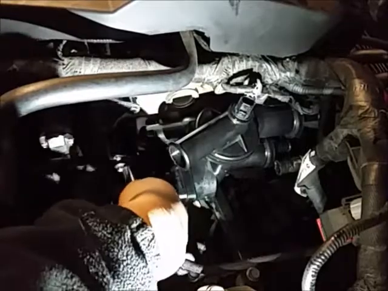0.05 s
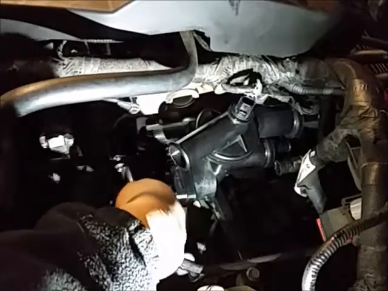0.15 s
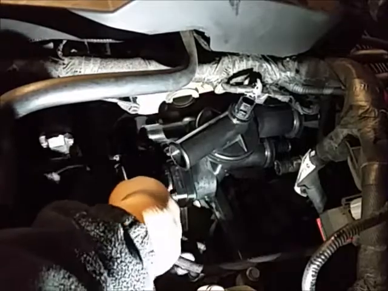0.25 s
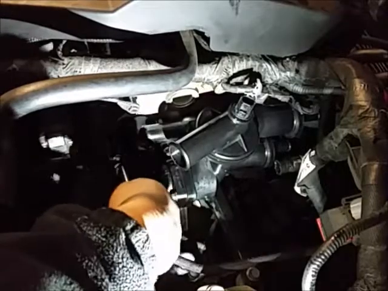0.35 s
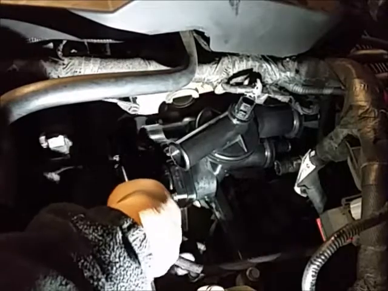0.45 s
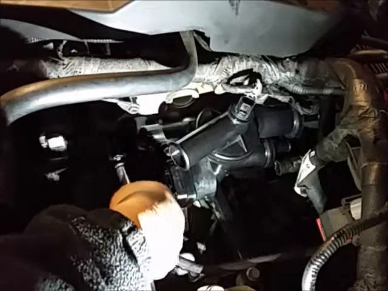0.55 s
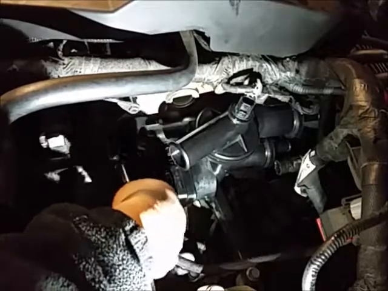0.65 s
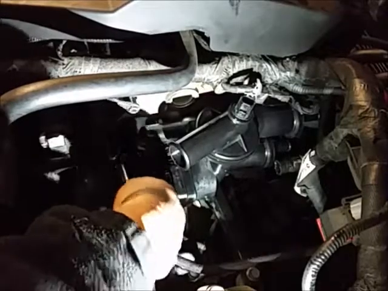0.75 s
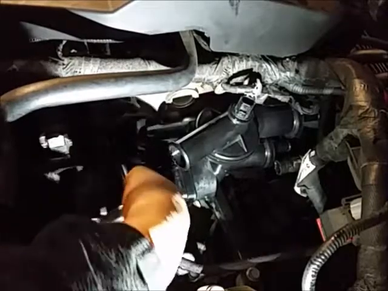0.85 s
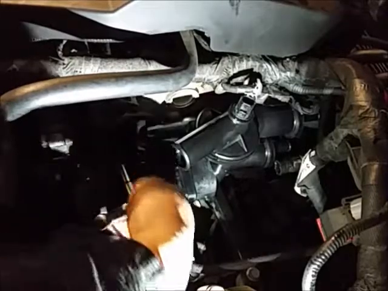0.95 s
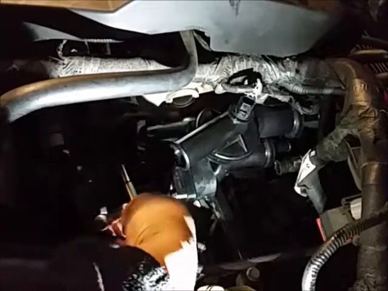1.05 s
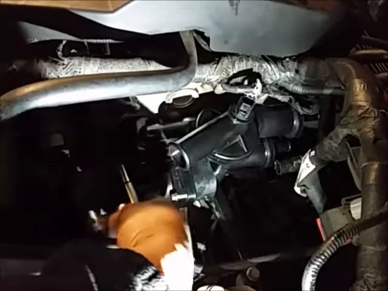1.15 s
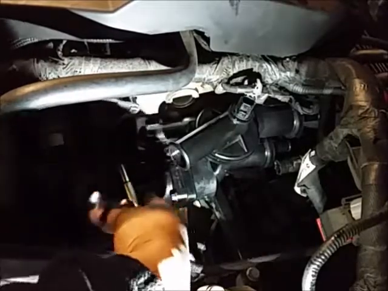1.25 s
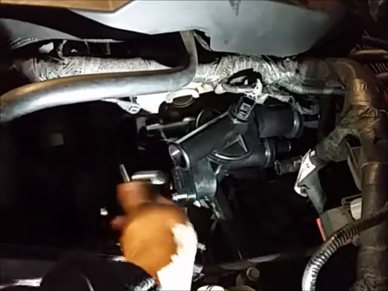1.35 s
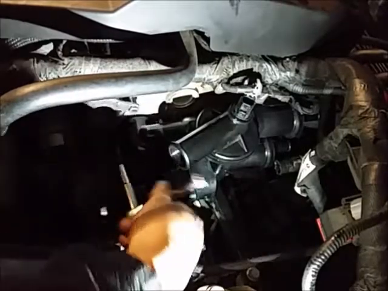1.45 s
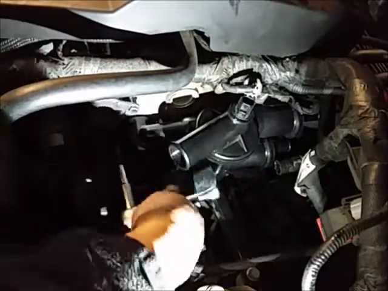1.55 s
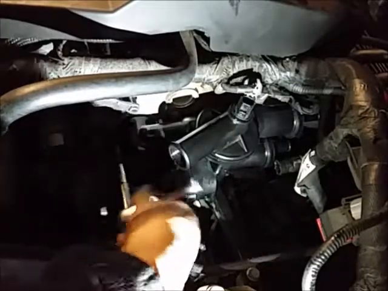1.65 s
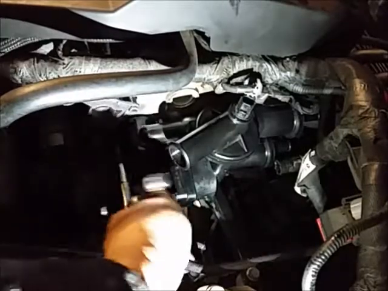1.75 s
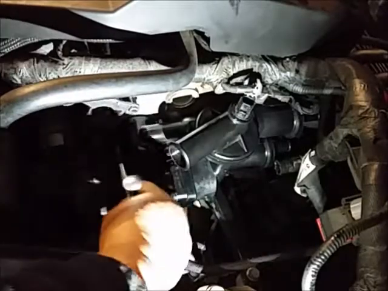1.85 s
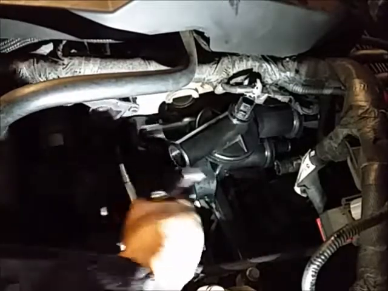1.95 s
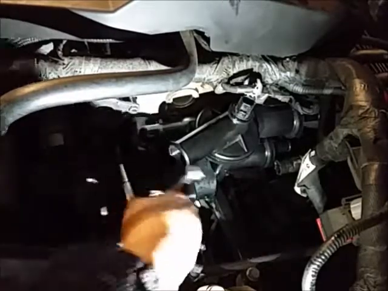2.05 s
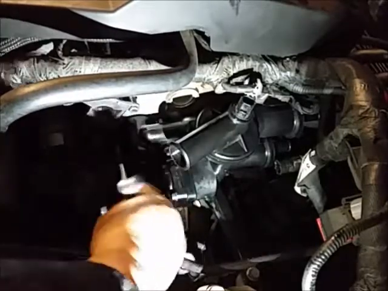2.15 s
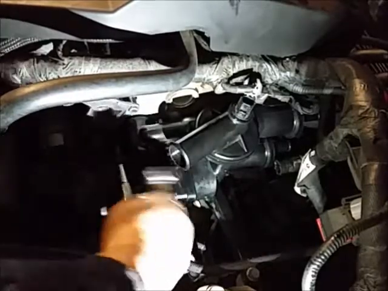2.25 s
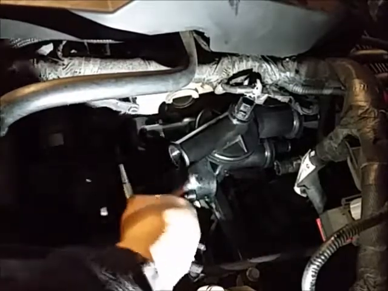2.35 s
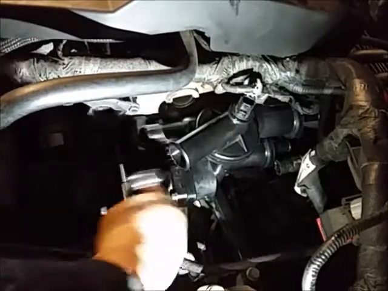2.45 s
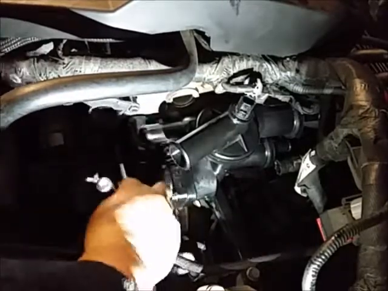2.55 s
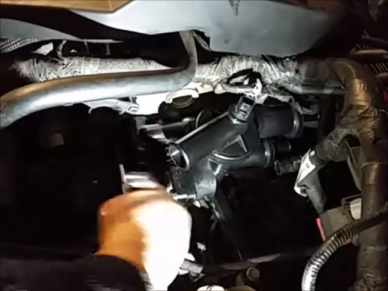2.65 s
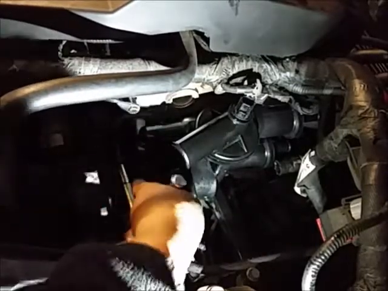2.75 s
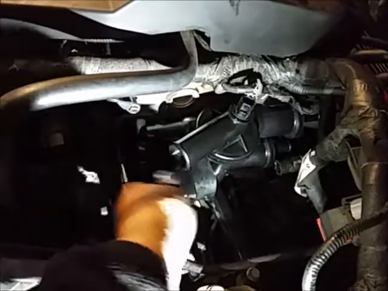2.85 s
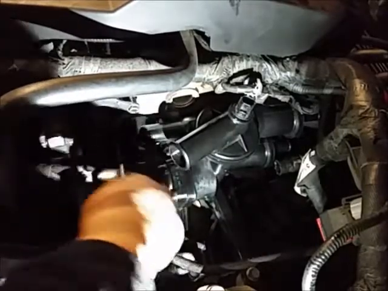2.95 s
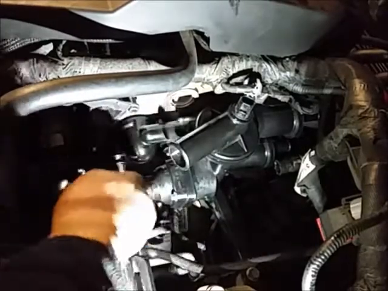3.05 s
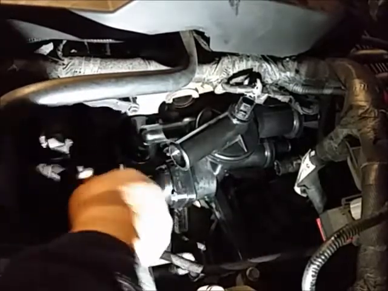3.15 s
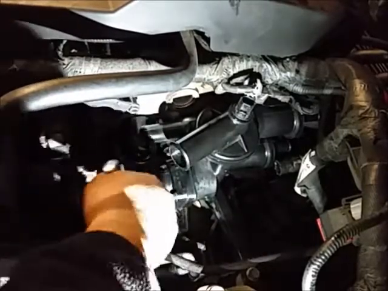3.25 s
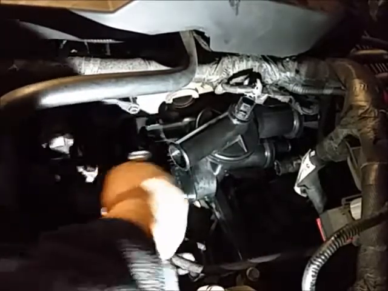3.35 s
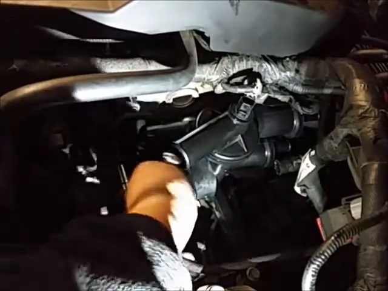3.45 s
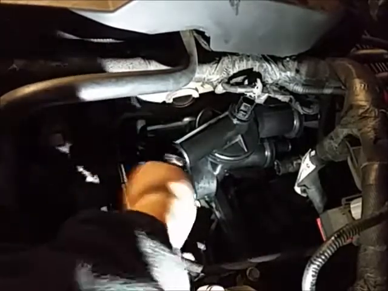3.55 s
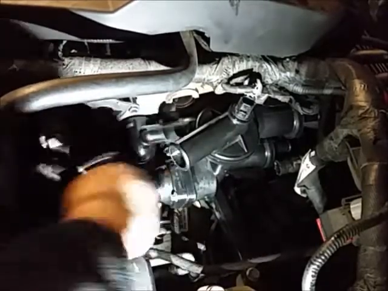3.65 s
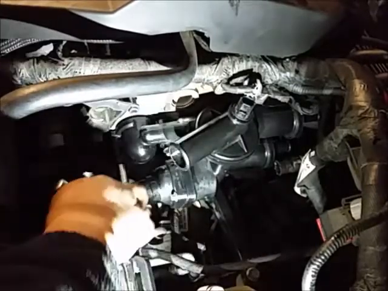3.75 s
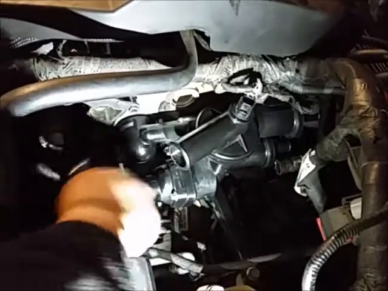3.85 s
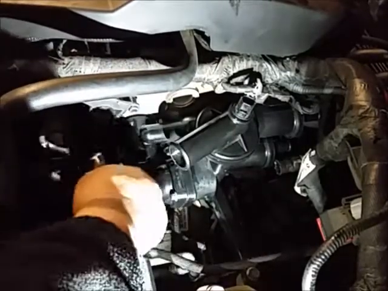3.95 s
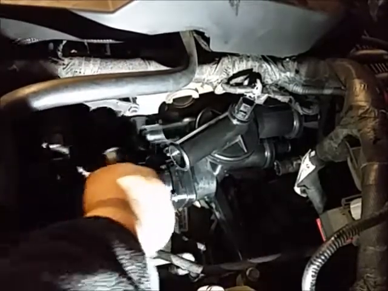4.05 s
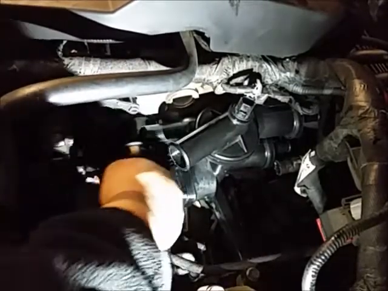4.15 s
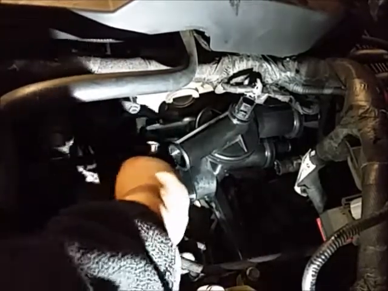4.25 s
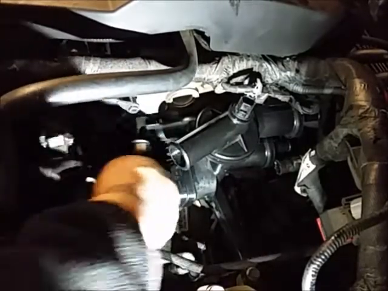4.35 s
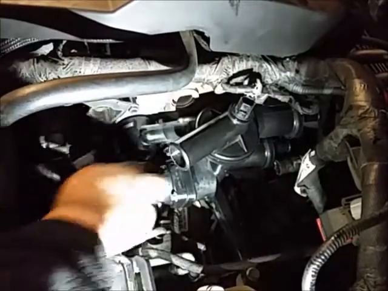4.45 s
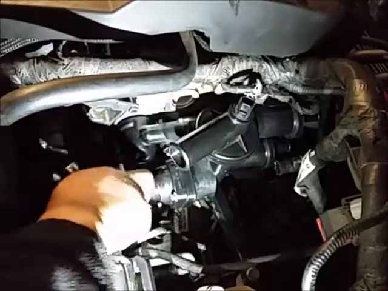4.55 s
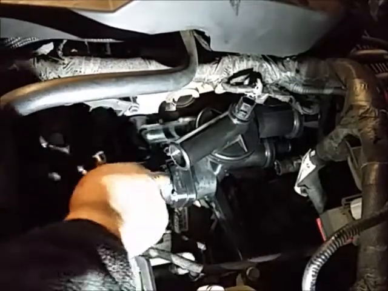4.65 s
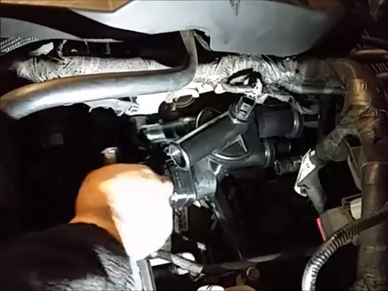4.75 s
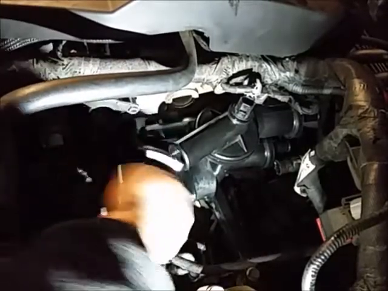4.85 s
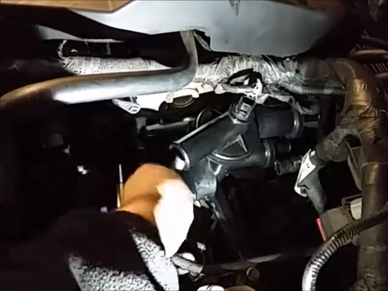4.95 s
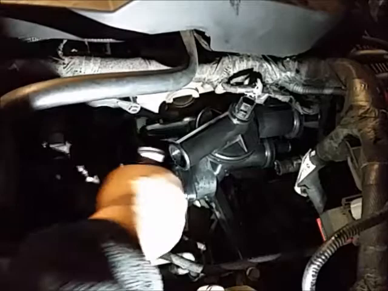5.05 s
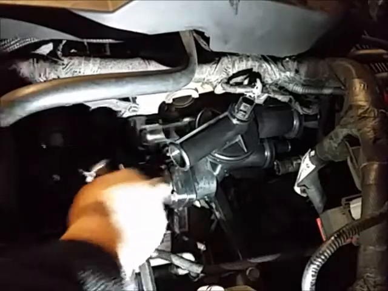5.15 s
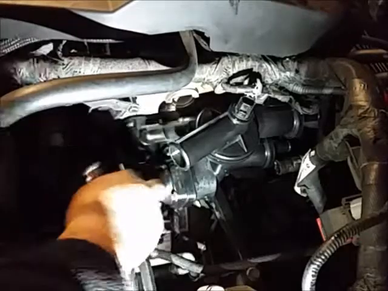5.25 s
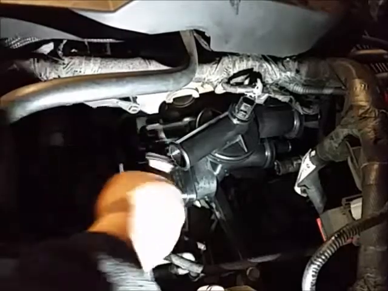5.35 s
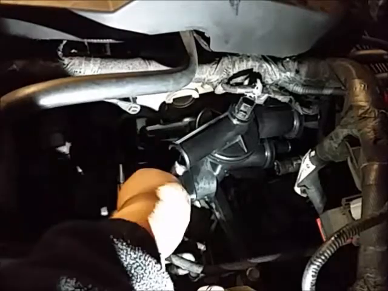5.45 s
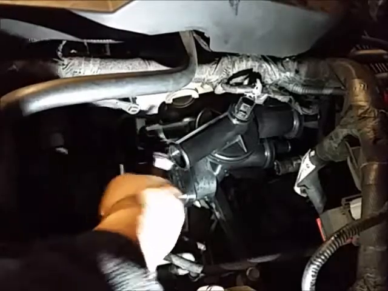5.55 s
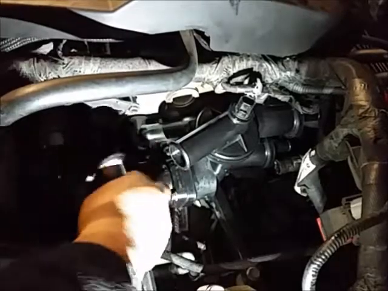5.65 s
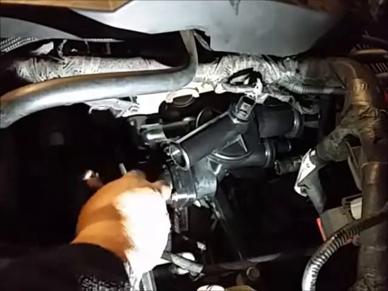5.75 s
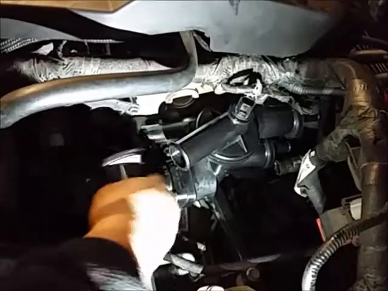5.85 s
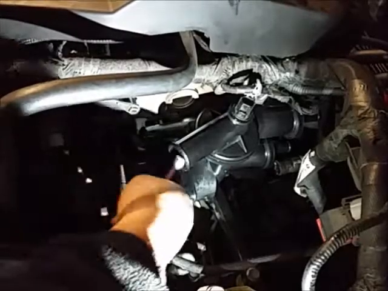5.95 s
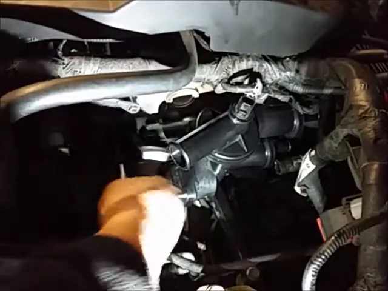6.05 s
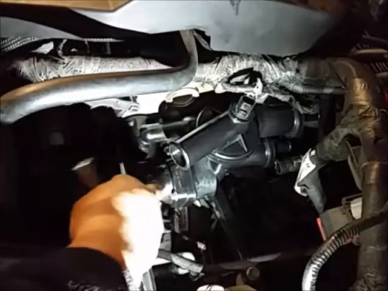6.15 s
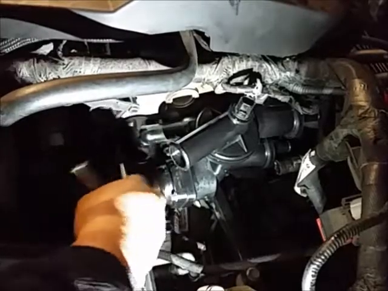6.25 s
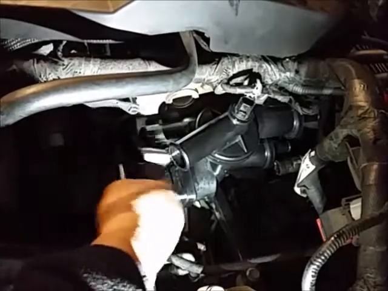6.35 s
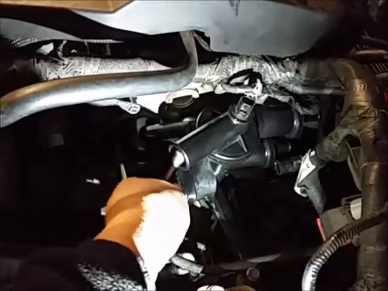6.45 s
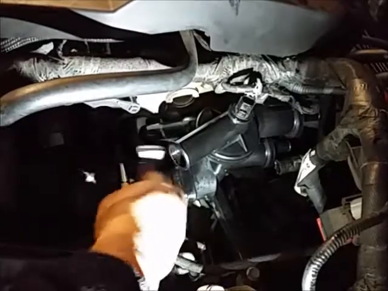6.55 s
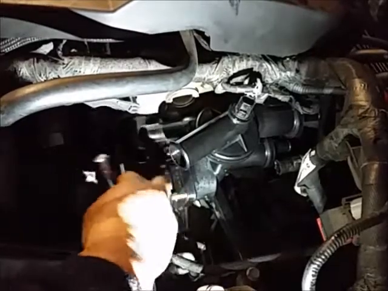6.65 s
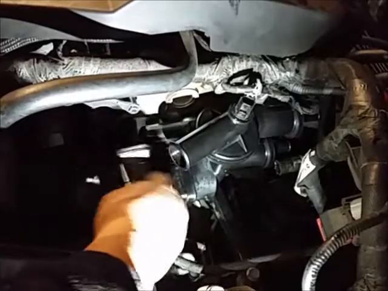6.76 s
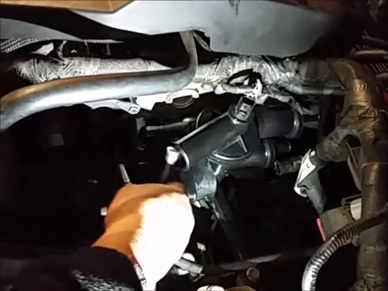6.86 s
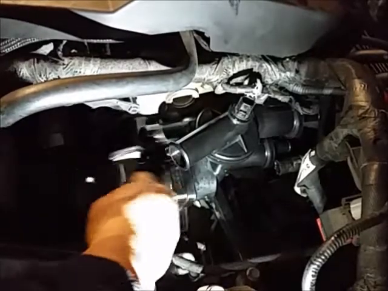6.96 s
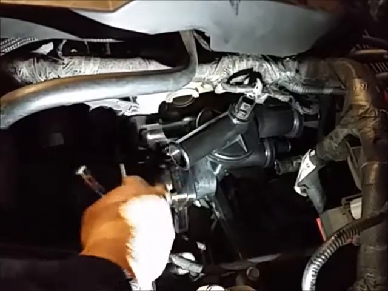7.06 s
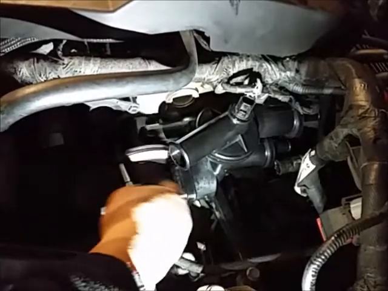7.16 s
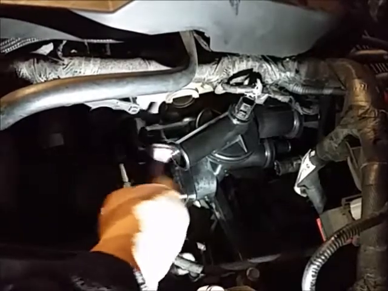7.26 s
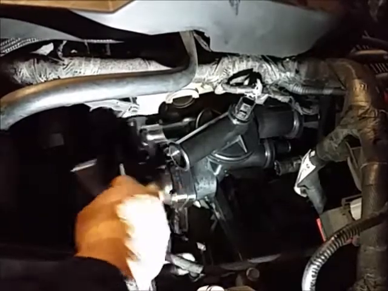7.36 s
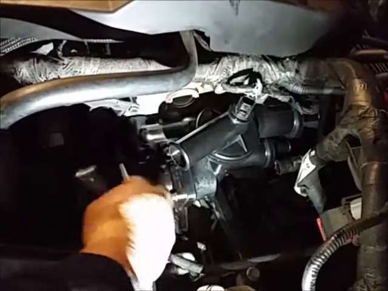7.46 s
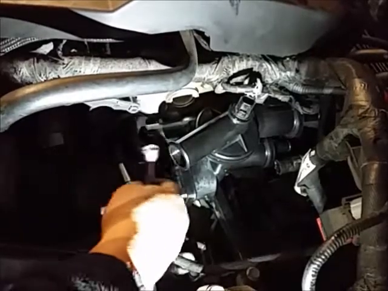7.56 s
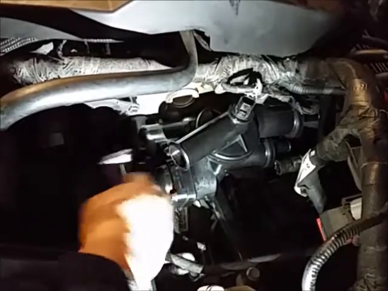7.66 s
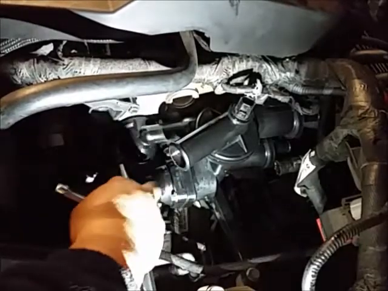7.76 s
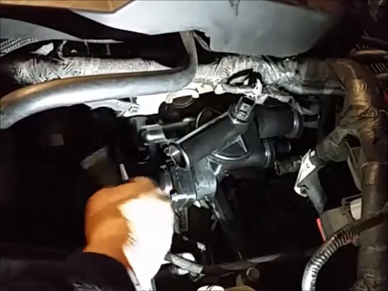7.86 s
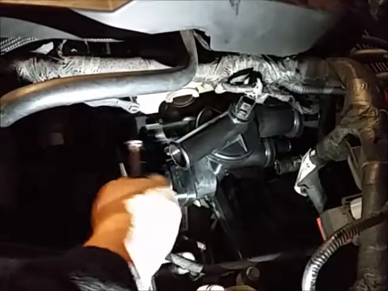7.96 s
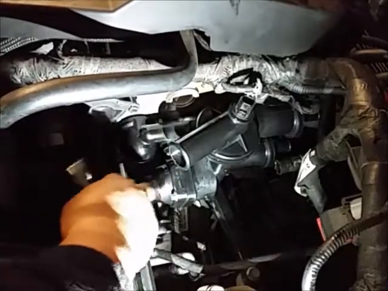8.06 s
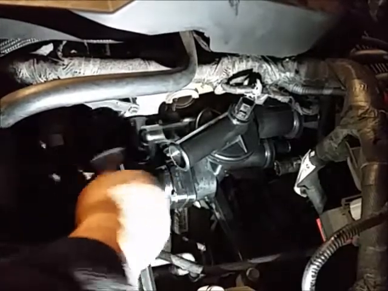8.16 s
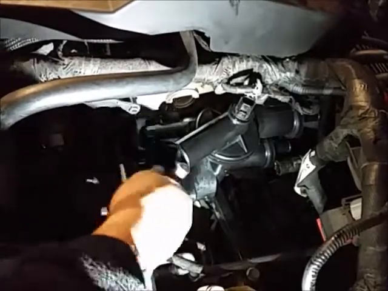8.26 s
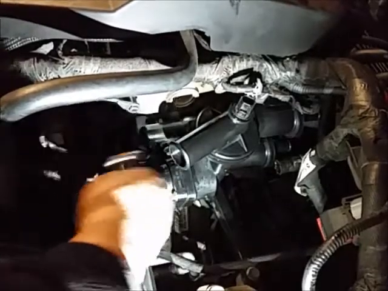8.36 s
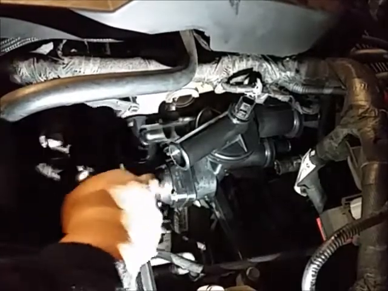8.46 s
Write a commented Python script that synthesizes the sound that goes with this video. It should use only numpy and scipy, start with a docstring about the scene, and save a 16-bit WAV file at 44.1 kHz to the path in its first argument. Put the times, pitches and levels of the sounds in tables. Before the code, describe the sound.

Metal knocks and quick bursts of ratchet clicking on an engine, with constant high-pitched hiss and faint distant traffic rumble.

```python
"""A knock of steel on an engine comes first, then a ratchet wrench clicks in runs in a garage.
Each knock excites the damped modes of the engine's covers; each click is the pawl snapping over a tooth
and ringing the ratchet head. Between them, friction of hand and wrench gives a rub and a fine scrape.
Far traffic drones through the walls over steady air and mains hum; the left microphone hisses near 5 kHz."""
import sys
import numpy as np
from scipy.fft import rfft, irfft, next_fast_len
from scipy.io import wavfile
from scipy.ndimage import map_coordinates

SR = 44100
rng = np.random.default_rng(int(sys.argv[2]) if len(sys.argv) > 2 else 0)


def dump(signal):
    """Clip the signal to [-1, 1] and save it as 16-bit WAV at the path in sys.argv[1]."""
    limited = np.clip(np.atleast_2d(signal).T, -1, 1)
    pcm = np.round(limited * 32767).astype(np.int16)
    wavfile.write(sys.argv[1], SR, pcm)


N = 375732


def amp(db):
    """Amplitude ratio of a level in decibels."""
    return np.exp(np.asarray(db) * (np.log(10) / 20))

def unit(x):
    """Normalisation to rms 1."""
    return x / np.sqrt(np.mean(x ** 2) + 1e-20)

def along(points, hz):
    """Interpolation of (f/Hz, value) points on a logarithmic frequency axis."""
    f, values = np.transpose(points)
    return np.interp(np.log(hz + 1), np.log(f + 1), values)

def curves(rows):
    """Linear interpolation in time: one value per sample for each column after t/s."""
    times, *columns = np.transpose(rows)
    return [np.interp(np.arange(N) / SR, times, column) for column in columns]

def wobble(rate):
    """Smooth random modulation: a spline through `rate` Gaussian values a second."""
    return map_coordinates(rng.standard_normal(int(N * rate / SR) + 4), [np.arange(N) * rate / SR])

def filtered(x, response):
    """Linear filtering: the spectrum is multiplied by a complex frequency response."""
    size = next_fast_len(N + 8192)
    return irfft(rfft(x, size) * response(np.fft.rfftfreq(size, 1 / SR)), size)[..., :N]

# Likeness of the sound field at the two microphones: f/Hz, coherence
COHERENCE = [(40, 1), (150, 0.89), (400, 0.77), (1500, 0.2), (4000, 0.1), (10000, 0.012)]
def diffuse_noise(gain):
    """A diffuse field is coherent at long wavelengths: stereo noise of rms 1, shaped by gain(f)."""
    size = next_fast_len(N)
    hz = np.fft.rfftfreq(size, 1 / SR)
    angle = np.arccos(np.clip(along(COHERENCE, hz), -1, 1)) / 2
    real, imag = rng.standard_normal((2, 2, len(hz)))
    mid, side = irfft((real + 1j * imag) * gain(hz) * [np.cos(angle), np.sin(angle)], size)[:, :N]
    return unit(np.array([mid + side, mid - side]))

# Garage air, low and treble spectra: f/Hz, relative density/dB
AIR_LOW = [(180, -31.5), (300, 2), (420, -4), (478, 1.5), (754, -14.5), (946, -14), (1510, -16),
           (4000, -24), (5200, -58.5), (8800, -120)]
AIR_TREBLE = [(3000, -40.5), (3800, -3.5), (5000, 3.5), (6000, -1), (6400, -26), (7000, -70)]
def garage_air():
    """Stationary noise in two broad bands forms the ambient floor."""
    low = amp(-66.5) * diffuse_noise(lambda f: amp(along(AIR_LOW, f)))
    treble = amp(-76.5) * diffuse_noise(lambda f: amp(along(AIR_TREBLE, f)))
    return low + treble

def drone(hz, db):
    """Slow phase and amplitude modulation make a sinusoid waver."""
    phase = 2 * np.pi * np.cumsum(hz) / SR + 0.31 * wobble(5.1)
    return np.sqrt(2) * amp(db + 2.3 * wobble(3.4)) * np.sin(phase)

def mains_hum():
    """A wavering tone at twice the supply frequency."""
    return drone(hz=np.full(N, 120), db=-56)

# Envelope of the traffic rumble: t/s, level/dB
RUMBLE_LEVEL = [(0, -46.5), (.35, -50), (.95, -49.5), (1.9, -45.5), (3.1, -43.5), (3.84, -45), (4.08, -41),
                (4.6, -45.5), (5.4, -44), (6.19, -42.5), (6.45, -45), (7.2, -43), (7.6, -45), (8.52, -45.5)]
# Its spectrum: f/Hz, relative density/dB
RUMBLE_SPECTRUM = [(12, -46), (20, -8.5), (54, -5.5), (85, -3.5), (134, -11), (166, -10), (189, -16),
                   (226, -14), (265, -40), (300, -24.5), (390, -53), (660, -120)]
# Truck engine: t/s, firing f/Hz, level at f/dB, level at 1.5 f/dB
TRUCK = [(1.8, 42.5, -56, -55), (2.53, 53, -47, -48), (3.32, 65, -52, -52), (3.5, 76, -48, -56),
         (3.75, 81.5, -49, -57), (4.44, 80, -42, -63), (4.8, 84.5, -45, -68), (4.96, 79, -45, -58),
         (6.42, 85.5, -54, -55), (7.3, 76, -54, -49), (7.79, 79.2, -44.5, -68), (8.52, 82, -48, -62)]
# Car engine: t/s, firing f/Hz, level/dB
CAR = [(4.9, 95.1, -44), (5.3, 95.2, -43), (5.8, 96.5, -47), (6.5, 96.6, -52)]
def traffic():
    """Walls transmit mainly bass: broadband rumble and the periodic firing of two far engines."""
    def fade(rows):
        t = np.arange(N) / SR
        return np.clip((t - rows[0][0]) / 0.25, 0, 1) * np.clip((rows[-1][0] + .3 - t) / 0.23, 0, 1)

    rumble_db = curves(RUMBLE_LEVEL)[0] + 0.43 * wobble(3.123)
    rumble = amp(rumble_db) * diffuse_noise(lambda f: amp(along(RUMBLE_SPECTRUM, f)))
    hz, firing_db, upper_db = curves(TRUCK)
    truck = drone(hz, firing_db) + drone(hz * 1.5, upper_db)
    truck += sum(drone(hz * order, firing_db - 12) for order in (.5, 2))  # further shaft orders
    return rumble + fade(TRUCK) * truck + fade(CAR) * drone(*curves(CAR))

def pawl_drag(width_s=.08, lag_s=.05, clicks_to_saturate=4):
    """Drag follows click density: 0 at rest, towards 1 while the pawl rides over a run of teeth."""
    t = np.arange(0, N / SR, .005)
    delay = t[:, None] - lag_s - np.array(CLICKS)[:, 0]
    density = np.exp(-.5 * (delay / width_s) ** 2).sum(axis=1)
    return np.interp(np.arange(N) / SR, t, np.tanh(density / clicks_to_saturate))

# Envelope of the rubbing: t/s, level/dB
RUB_LEVEL = [(0.0, -56), (0.14, -61), (0.95, -63), (1.54, -62), (1.73, -58), (2.16, -59), (2.54, -56),
             (3.68, -59), (3.89, -57), (4.27, -61), (4.48, -61), (4.62, -57), (5.03, -59), (5.15, -53),
             (5.86, -58), (6.26, -55), (6.36, -57), (7.26, -52), (7.45, -53), (7.62, -58), (8.19, -57),
             (8.52, -55)]
# Spectra of the dull rub and the metallic scrape: f/Hz, relative density/dB
RUB_SPECTRUM = [(140, -30.5), (240, -5), (450, -9), (700, -13), (1100, -17), (1500, -22.5), (2800, -30),
                (5000, -29.5), (6100, -32.5), (6500, -61), (8000, -120)]
SCRAPE_SPECTRUM = [(5290, -45), (9000, -28.5), (9480, -20), (10100, -9.5), (11400, -4), (12700, -2.5),
                   (13500, 3), (15900, 4.5)]
def friction():
    """Sliding friction of hand and wrench: uneven noise through the engine's modes, and a fine scrape."""
    def resonance(f):
        return 3 + 0.28 * sum(1 / (1 + ((f - hz) * t60 / 3) ** 2) for hz, _, t60 in ENGINE_MODES)

    rub_db, = curves(RUB_LEVEL)
    drag = pawl_drag()
    rub = amp(1.2 * wobble(8) + 3.3 * wobble(30) + 0.536 * wobble(90))
    rub = rub * diffuse_noise(lambda f: resonance(f) * amp(along(RUB_SPECTRUM, f)))
    flicker = amp(1.2 * wobble(55))
    scrape = flicker * diffuse_noise(lambda f: amp(along(SCRAPE_SPECTRUM, f)) * (f < 15850))
    # Full drag adds 7 dB to the scrape and 1 dB to the rub.
    scrape_db = -74.5 + 7 * drag + .4 * (rub_db - rub_db.mean())
    return amp(rub_db + drag) * unit(rub) + amp(scrape_db) * unit(scrape)

def impacts(times, mode_db, noise_db, decay_scale, pan_gains, modes, bands, scatter_db, detune, rise_s):
    """Modal superposition: each blow excites damped sinusoids and noise that decays band by band."""
    lead = SR // 10  # room for a blow before t = 0
    sound = np.zeros((2, N + lead + SR))
    band_power = np.zeros((len(bands), *sound.shape))
    hz, level, t60 = np.transpose(modes)[:, :, None]
    low_hz, high_hz, band_db, band_t60 = np.transpose(bands)[:, :, None]
    t = np.arange(int(SR * t60.max())) / SR
    t_noise = np.arange(int(SR * band_t60.max())) / SR
    rise = (1 - np.exp(-t_noise / rise_s)) ** 2  # the contact force builds smoothly
    spread = np.arccos(np.clip(along(COHERENCE, hz), -1, 1))[:, 0]
    chance = rng.standard_normal((len(times), len(modes), 3))
    for k, start in enumerate(np.round(times * SR).astype(int) + lead):
        stretch = np.clip(decay_scale[k], .4, 1.6)
        gain = amp(mode_db[k] + scatter_db * chance[k, :, 0])
        pitch = hz * (1 + detune * chance[k, :, 1:2])
        damping = np.log(1000) / (t60 * stretch)
        ring = amp(level) * np.exp((2j * np.pi * pitch - damping) * t) * rise[:len(t)]
        angle = spread * chance[k, :, 2] / 2  # each microphone meets a mode at its own phase
        mid = (gain * np.cos(angle)) @ ring.imag
        side = (gain * np.sin(angle)) @ ring.real
        pan = pan_gains[k][:, None]
        sound[:, start:start + len(t)] += pan * [mid + side, mid - side]
        burst = rise * amp(band_db + noise_db[k][:, None] - 60 * t_noise / (band_t60 * stretch))
        band_power[:, :, start:start + len(t_noise)] += (burst[:, None] * pan) ** 2
    sound = sound[:, lead:lead + N]
    for low, high, power in zip(low_hz, high_hz, band_power):
        order = 12 + high / 300
        noise = diffuse_noise(lambda f: 1 / (1 + (low / (f + 1)) ** 12) / (1 + (f / high) ** order))
        sound += np.sqrt(power[:, lead:lead + N]) * noise
    return sound

# Blows on the engine: t/s, level/dB, then relative level/dB of the thud (below 300 Hz),
# body (near 400 Hz), bite (near 1.5 kHz) and snap (near 3 kHz)
KNOCKS = [(0.296, -44, -14, -12, -12, -25), (0.327, -40, -12, -13, -9, -17), (0.649, -40, -3, -9, -18, -35),
          (0.698, -45, -8, -7, -16, -28), (0.723, -41, -7, -12, -10, -26), (0.863, -40, -7, -7, -28, -34),
          (0.932, -45, -5, -8, -14, -30), (0.964, -50, -2, -12, -10, -25), (1.433, -41, -10, -10, -19, -35),
          (1.512, -47, -4, -12, -8, -26), (1.559, -47, -2, -14, -11, -28), (1.629, -48, -3, -13, -12, -27),
          (1.747, -37, -5, -9, -10, -20), (1.903, -46, -3, -9, -9, -23), (1.963, -44, -8, -9, -14, -26),
          (2.059, -44, -2, -6, -20, -30), (2.187, -42, -4, -13, -15, -32), (2.234, -35, -8, -10, -18, -33),
          (2.367, -39, -1, -17, -8, -26), (2.443, -36, -9, -15, -13, -33), (2.519, -42, -3, -13, -15, -30),
          (2.56, -38, -4, -12, -15, -32), (2.606, -42, -7, -11, -12, -24), (2.741, -33, -6, -12, -15, -36),
          (2.836, -40, -4, -13, -14, -31), (2.998, -44, 1, -8, -19, -29), (3.188, -27, -11, -12, -17, -32),
          (3.231, -38, -4, -5, -16, -24), (3.716, -45, -4, -7, -20, -26), (3.964, -27, -12, -13, -16, -27),
          (4.023, -38, 0, -9, -18, -31), (4.509, -42, -3, -12, -17, -22), (4.619, -31, -10, -13, -17, -34),
          (4.722, -28, -9, -11, -18, -36), (4.768, -33, -9, -13, -17, -32),
          (5.014, -10, -17, -13, -12, -26), (5.046, -25, -17, -7, -19, -34),
          (5.137, -30, -7, -12, -15, -34), (5.171, -35, -9, -10, -11, -31), (5.24, -36, -8, -11, -12, -25),
          (5.281, -38, -13, -8, -15, -28), (5.312, -41, -7, -11, -12, -27), (5.434, -38, -6, -10, -15, -33),
          (5.559, -17, -17, -13, -14, -39), (5.735, -46, -4, -10, -8, -23), (5.791, -38, -9, -14, -14, -27),
          (5.948, -39, -13, -15, -15, -32), (6.07, -16, -13, -11, -11, -21),
          (6.22, -34, -14, -13, -14, -32), (6.391, -35, -8, -15, -11, -31),
          (6.554, -17, -13, -13, -13, -23), (6.583, -26, -10, -14, -14, -26),
          (6.703, -37, -8, -12, -20, -26), (6.851, -31, -13, -13, -13, -26),
          (6.953, -11, -19, -20, -11, -37), (7.141, -38, -3, -18, -14, -25),
          (7.236, -31, -21, -21, -9, -25), (7.263, -38, -9, -11, -20, -31),
          (7.333, -12, -14, -20, -11, -34), (7.427, -40, -3, -9, -15, -26), (7.465, -38, -4, -12, -12, -24),
          (7.587, -30, -14, -17, -15, -31), (7.821, -40, -1, -12, -12, -23),
          (7.894, -41, -6, -11, -19, -25), (7.925, -41, -1, -12, -8, -26), (8.113, -39, -5, -13, -11, -24),
          (8.3, -41, -12, -8, -12, -26), (8.409, -33, -10, -15, -15, -24), (8.437, -32, -11, -13, -12, -37),
          (8.48, -37, -8, -10, -13, -29)]
# The opening blow: the same columns without t/s
FIRST_KNOCK = (-16, -24, -3, -7, -45)
# Excitation by frequency zone: upper f/Hz, gain/dB, weights of thud, body, bite and snap
KNOCK_ZONES = [(300, 3.5, .8, 0, 0, 0), (520, 4, 0, .8, 0, 0), (850, -6, 0, 0, .1, 0),
               (1400, 2.5, 0, 0, .85, 0), (2200, 1, 0, 0, .8, .2), (3100, 8.5, 0, 0, .3, .7),
               (20000, 6.5, 0, 0, 0, 1)]
# Modes of the covers and brackets: f/Hz, level/dB, nominal T60/s
ENGINE_MODES = [(161, -13, 0.053), (213.78, -0.5, 0.14), (277, -13, 0.078), (360.2, -12.5, 0.1106),
                (442.8, -4.5, 0.091), (593.6, -6, 0.091), (639.7, -1.5, 0.079), (692, 3, 0.015),
                (756, -17.5, 0.14), (984, -3, 0.055), (1114, -7, 0.074), (1206, 12, 0.0082),
                (1324, -8, 0.045), (1514, -4, 0.054), (1750, -4, 0.046), (1960, -3, 0.057),
                (2000, 9.5, 0.0068), (2100, -9, 0.039), (2390, -10, 0.035), (2685, -15, 0.05),
                (3540, 0, 0.026), (4380, 7, 0.029), (4820, 2.5, 0.028), (5280, -3, .02), (5700, -4, 0.024)]
# Rattle and garage reverberation: lower f/Hz, upper f/Hz, level/dB, nominal T60/s
RATTLE_BANDS = [(140, 270, -12, 0.21), (294, 567, -9.5, 0.16), (486, 895, -15.5, 0.23),
                (834, 1370, -16, 0.14), (1370, 2400, -10, 0.12), (1400, 2700, -31, 0.3),
                (2480, 5800, -6.5, 0.047), (4000, 6200, 1, 0.035)]
def knocks(first_s=-.003, contact_s=.001):
    """Impact excitation: where and how hard the wrench lands weights the modes; light taps ring longer."""
    rows = np.array([(first_s, *FIRST_KNOCK)] + KNOCKS)
    times, level, timbre = rows[:, 0], rows[:, 1], rows[:, 2:]
    zones = np.array(KNOCK_ZONES)
    zone_db = level[:, None] + zones[:, 1] + timbre @ zones[:, 2:].T
    excitation = lambda hz: zone_db[:, np.searchsorted(zones[:, 0], hz)]
    modes_hz = np.array(ENGINE_MODES)[:, 0]
    bands_hz = np.sqrt(np.prod(np.array(RATTLE_BANDS)[:, :2], axis=1))
    return impacts(times + contact_s, excitation(modes_hz), excitation(bands_hz),
                   decay_scale=.75 - .01 * level, pan_gains=np.ones((len(times), 2)),
                   modes=ENGINE_MODES, bands=RATTLE_BANDS, scatter_db=2.5, detune=.03, rise_s=.00083)

# Pawl clicks: t/s, level/dB, relative level at 9-12.4 kHz/dB
CLICKS = [(0.3316, -39, -26), (0.3626, -50, -21), (0.7367, -41, -19), (1.708, -47, -13), (1.7469, -38, -22),
          (1.7998, -40, -22), (1.8153, -34, -24), (1.8547, -34, -20), (1.8816, -29, -23),
          (1.9066, -22, -28), (1.9325, -19, -31), (1.9664, -23, -30), (2.0627, -46, -22),
          (2.1106, -53, -20), (2.2393, -26, -25), (2.2628, -22, -26), (2.2882, -26, -20),
          (2.3211, -31, -18), (2.3675, -49, -22), (2.3955, -50, -18), (2.4314, -52, -19),
          (2.5187, -50, -24), (2.6055, -27, -25), (2.6259, -30, -22), (2.6469, -34, -20),
          (2.6748, -33, -30), (2.7417, -54, -18), (2.7554, -55, -14), (2.7856, -54, -21),
          (3.0315, -44, -19), (3.049, -41, -28), (3.0844, -44, -20), (3.0949, -36, -27), (3.1228, -41, -21),
          (3.1328, -36, -22), (3.1434, -40, -17), (3.1707, -37, -16), (3.1966, -42, -14),
          (3.2355, -42, -17), (3.2555, -37, -21), (3.2644, -42, -13), (3.2969, -25, -29),
          (3.7294, -43, -24), (3.7838, -33, -18), (3.7984, -34, -13), (3.8152, -34, -13),
          (3.8282, -32, -17), (3.8424, -34, -18), (3.8681, -41, -18), (3.8854, -44, -14),
          (3.9659, -39, -15), (4.0183, -54, -18), (4.566, -28, -28), (4.5804, -29, -20), (4.6014, -32, -17),
          (4.6259, -32, -17), (4.6528, -36, -16), (4.7227, -52, -13), (4.7616, -38, -26),
          (4.7895, -50, -20), (5.015, -22, -22), (5.0474, -43, -23), (5.1367, -54, -20), (5.2026, -26, -22),
          (5.2235, -28, -16), (5.2415, -25, -19), (5.2589, -23, -22), (5.2824, -28, -17),
          (5.3108, -29, -18), (5.3552, -30, -16), (5.5628, -55, -16), (5.7359, -33, -13),
          (5.7648, -35, -11), (5.7962, -34, -10), (5.8207, -33, -8), (5.8461, -32, -9), (6.0691, -24, -20),
          (6.2836, -35, -20), (6.3051, -28, -25), (6.333, -23, -30), (6.3954, -57, -8), (6.555, -31, -18),
          (6.6822, -36, -26), (6.7401, -28, -26), (6.763, -26, -28), (6.8069, -25, -29), (6.8518, -48, -21),
          (6.9551, -22, -27), (7.0564, -43, -22), (7.0998, -25, -22), (7.1187, -27, -18),
          (7.1392, -28, -21), (7.1701, -30, -21), (7.205, -32, -19), (7.2374, -48, -16), (7.2679, -47, -15),
          (7.3357, -28, -23), (7.4589, -31, -23), (7.4844, -33, -19), (7.5014, -34, -16),
          (7.5193, -35, -14), (7.5477, -30, -18), (7.5867, -50, -16), (7.6231, -55, -18),
          (7.8196, -40, -15), (7.8361, -36, -18), (7.8474, -38, -16), (7.863, -36, -17), (7.8795, -33, -20),
          (7.9029, -35, -20), (8.082, -50, -24), (8.1768, -26, -24), (8.1953, -26, -23), (8.2142, -25, -24),
          (8.2774, -50, -14), (8.2931, -42, -20), (8.4816, -30, -16), (8.4986, -27, -18),
          (8.5134, -21, -25), (2.2184, -51, -18), (2.312, -44, -16), (5.341, -48, -22), (7.0646, -46, -18),
          (7.47, -33, -17)]
# Modes of the ratchet head: f/Hz, level/dB, nominal T60/s
HEAD_MODES = [(10650, -4, .02), (10900, 1, .028), (11300, -5, .015), (11800, -5, .015), (13300, -14, .014),
              (13900, -9, .016), (14450, -9, .012), (14900, -1, .022), (15000, 8, .005), (15150, -6, .014),
              (15450, -3, .014), (15680, -6, .012)]
# Noise of a click: lower f/Hz, upper f/Hz, level/dB, nominal T60/s
SNAP_BANDS = [(1700, 4700, -43, .05), (4200, 6200, -35, 0.047), (2200, 6700, -46, .2),
              (6000, 7800, 1, 0.016), (9900, 13200, 9, 0.022), (13800, 16300, -5, 0.035),
              (14000, 16300, 5, 0.01), (12900, 15900, -25, 0.14), (9660, 15000, -11, 0.13)]
# Tone colour of the clicks, a dip at 8-9 kHz and fading above 16 kHz: f/Hz, gain/dB
CLICK_COLOUR = [(7700, 0), (8100, -18), (8800, -16), (9300, 0), (15750, 0), (16000, -16), (16600, -18),
                (17000, -35)]
def ratchet(loose_ticks=30, mean_wait_s=.07):
    """Free vibration: the head rings as the pawl snaps over each tooth; hard snaps decay fastest."""
    # Loose play adds faint ticks after randomly chosen clicks.
    tick_times = rng.choice(np.array(CLICKS)[:, 0], loose_ticks)
    tick_times += rng.exponential(mean_wait_s, loose_ticks)
    ticks = [(min(t, N / SR), -61, -17) for t in tick_times]
    times, level, relative_db = np.transpose(CLICKS + ticks)[:, :, None]
    chance = rng.standard_normal((len(times), 2, 1))
    pan_db = -3.5 + 3 * chance[:, 0]  # left minus right: the head turns to either side
    weak_band_db = -56 + .4 * level + 6 * chance[:, 1]
    excitation = lambda hz: np.select([hz < 6300, hz < 9000, hz < 12400],
                                      [level, weak_band_db, level + relative_db], level)
    modes_hz = np.array(HEAD_MODES)[:, 0]
    bands_hz = np.array(SNAP_BANDS)[:, :2].mean(axis=1)
    snaps = impacts(times[:, 0], excitation(modes_hz), excitation(bands_hz),
                    decay_scale=.75 - .011 * level[:, 0], pan_gains=amp(pan_db * [.5, -.5]),
                    modes=HEAD_MODES, bands=SNAP_BANDS, scatter_db=2.5, detune=.012, rise_s=.001)
    return filtered(snaps, lambda f: amp(along(CLICK_COLOUR, f)))

def scene():
    """Linear superposition: the pressures of all sources add at the two microphones."""
    return knocks() + ratchet() + friction() + garage_air() + traffic() + mains_hum()

# Balance of the microphones: f/Hz, left minus right level/dB
BALANCE = [(40, -2.3), (100, 3.5), (200, 3.5), (450, 8.5), (800, 3.5), (2000, 3.5), (5000, 10.5),
           (9000, 0.3), (15000, 0.6)]
# Envelope of the left microphone's hiss: t/s, level/dB
HISS_LEVEL = [(0, -47), (1.5, -48), (3.8, -46.3), (8.52, -46.8)]
# Its spectrum: f/Hz, relative density/dB
HISS_SPECTRUM = [(2290, -49), (3900, -32.5), (3970, -33.5), (4070, -35.5), (4190, -17.5), (4410, -5),
                 (4870, 3), (5170, 0.5), (5500, -4.5), (5730, -12.5), (5970, -12), (6500, -52),
                 (8450, -85.5), (14300, -120)]
def record(dry, left_lag_s=.0001695, cutoff_hz=17000, dc_offset=-.0006):
    """Band-limited transduction: the left microphone is louder, lags in the bass and adds self-noise."""
    side = np.array([[.5], [-.5]])
    lag = lambda f: left_lag_s / (1 + (f / 4000) ** 4)
    response = lambda f: amp(side * along(BALANCE, f)) * np.exp(-2j * np.pi * f * side * lag(f))
    channels = filtered(dry, response)
    hiss = unit(filtered(rng.standard_normal(N), lambda f: amp(along(HISS_SPECTRUM, f))))
    channels[0] += amp(curves(HISS_LEVEL)[0] + 0.42 * wobble(40)) * hiss
    return filtered(channels, lambda f: f < cutoff_hz) + dc_offset

dry = scene()
out = record(dry)
dump(out)
```